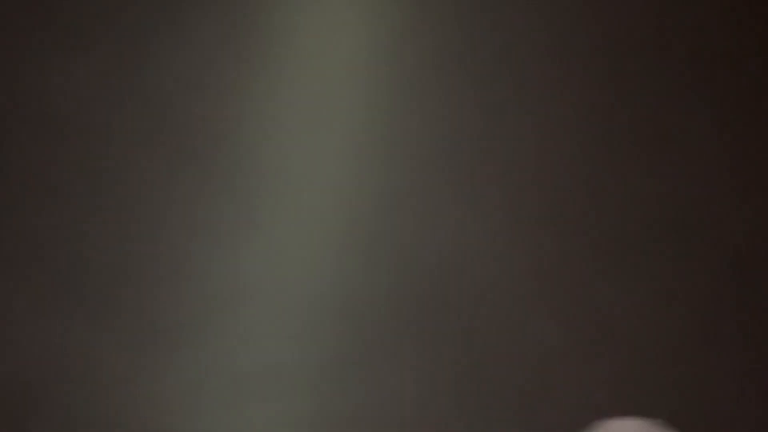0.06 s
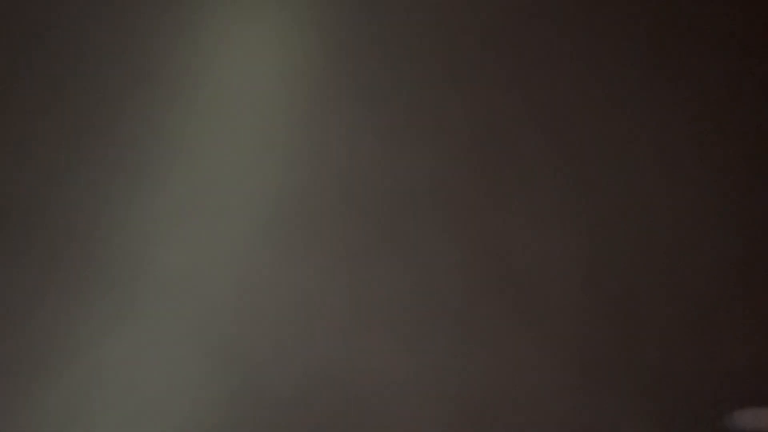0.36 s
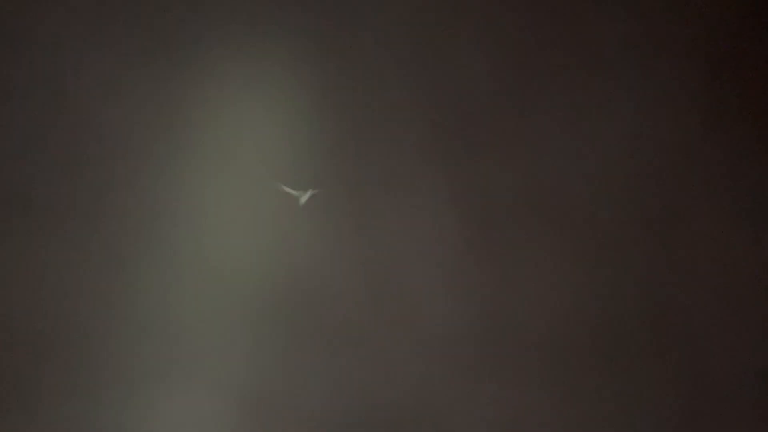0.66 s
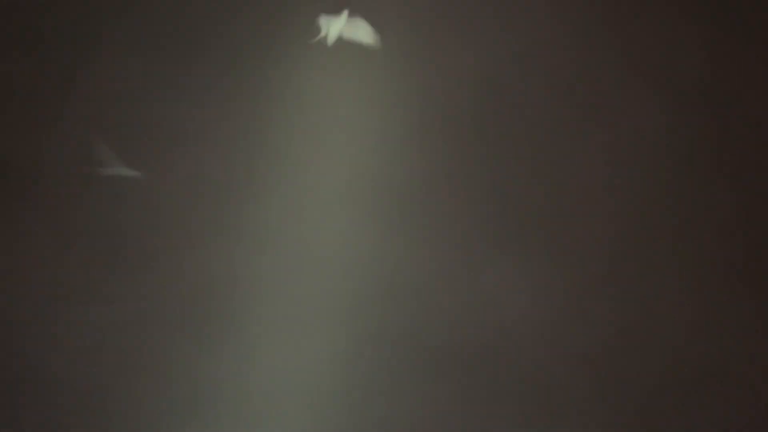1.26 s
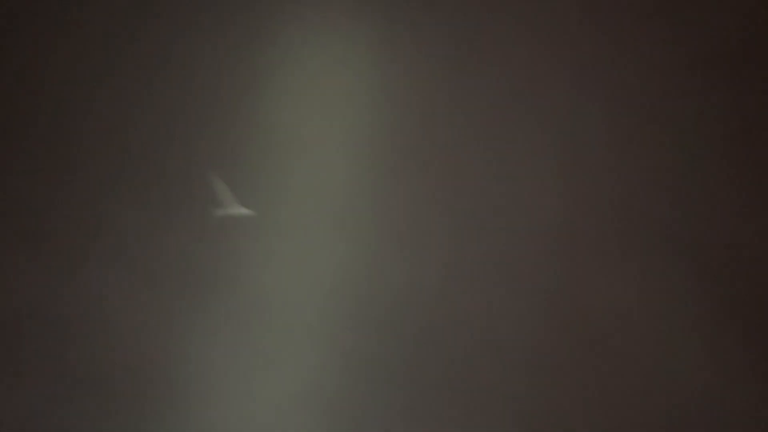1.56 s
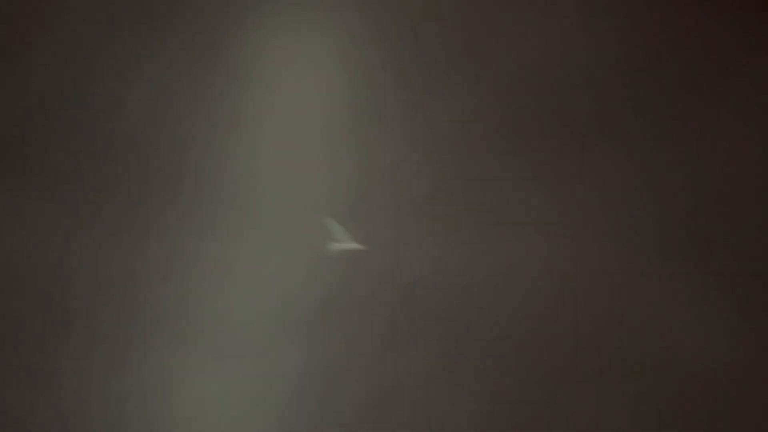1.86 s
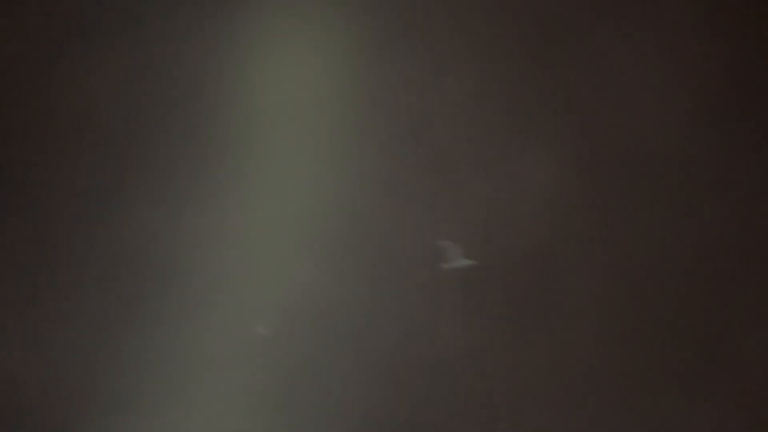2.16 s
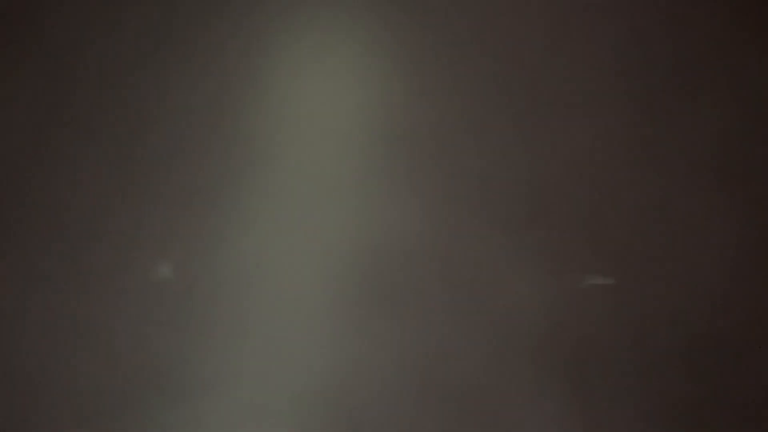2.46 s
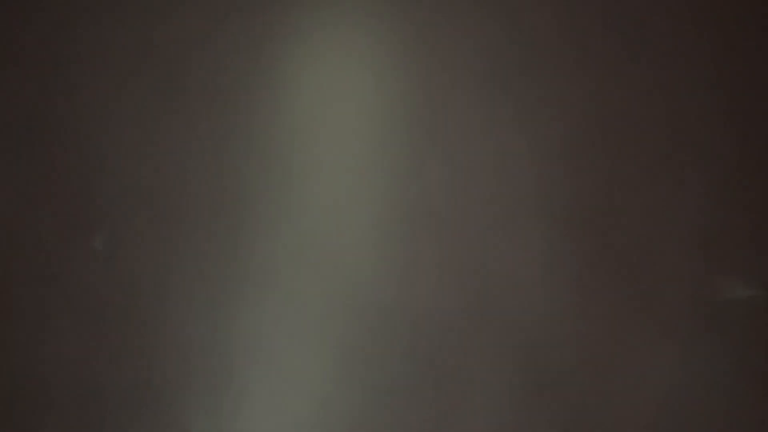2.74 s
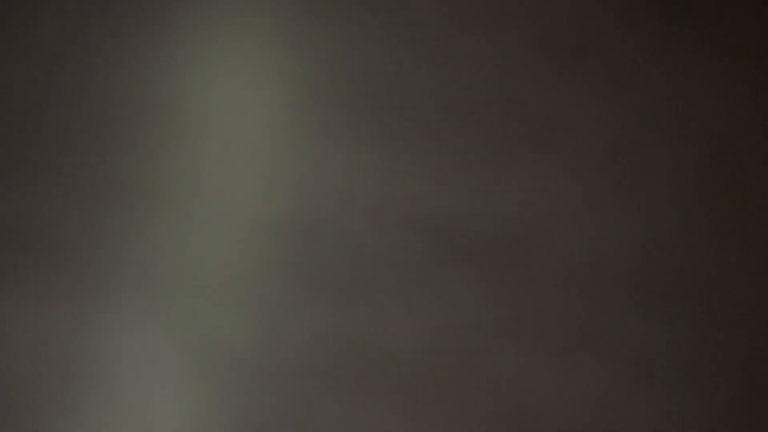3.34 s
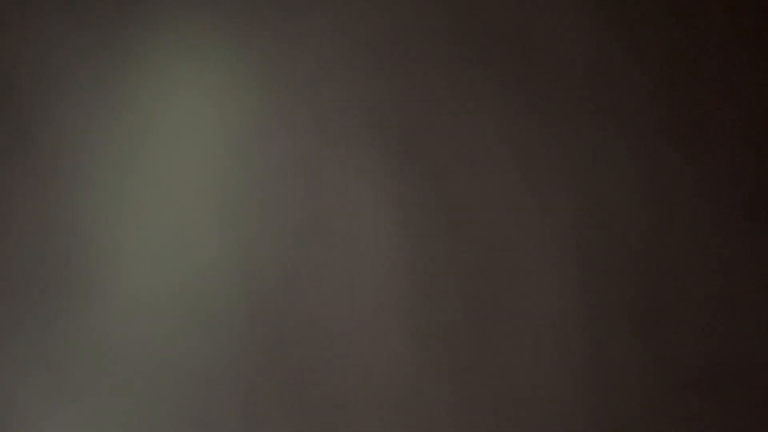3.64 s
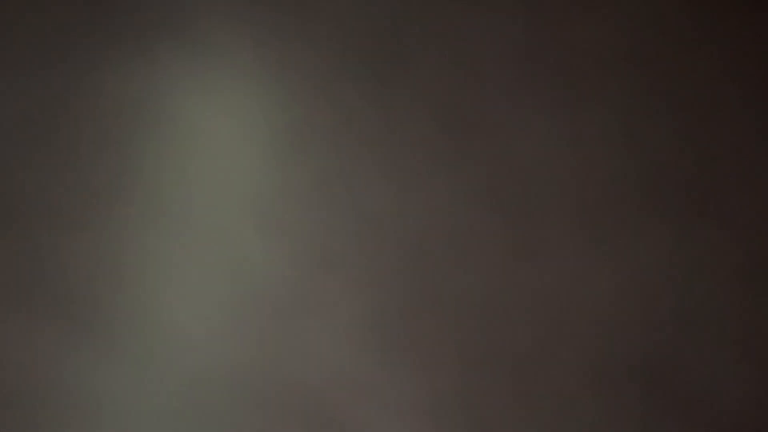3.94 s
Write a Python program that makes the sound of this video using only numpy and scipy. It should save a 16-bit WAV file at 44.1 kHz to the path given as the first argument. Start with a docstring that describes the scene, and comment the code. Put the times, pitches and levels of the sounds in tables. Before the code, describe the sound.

Harsh wailing and croaking calls of passing seabirds, with a distant colony and rumbling wind.

```python
"""A seabird colony at night, heard from a slope. From the start low wind rumbles on the microphone and
far birds cry. Passing birds give short yelps and falling cries, some close, others farther off, and the
slope answers faintly; at 0.6 s comes the first of three clean falling wails. Hoarse croaks join at 1.1 s
and drawn-out rasps at 1.5 s; yelps, croaks and rasps crowd the last second. Each passing call is a stack
of harmonics with an unsteady pitch and a rasp of noise, shaped by the throat."""
import sys
import numpy as np
from scipy import signal
from scipy.fft import rfft, irfft, next_fast_len
from scipy.io import wavfile
from scipy.ndimage import map_coordinates

SR = 44100
rng = np.random.default_rng(int(sys.argv[2]) if len(sys.argv) > 2 else 0)


def materialize(psi):
    """Save the field psi as 16-bit PCM at rate SR to the path in sys.argv[1].

    A 1-D psi becomes a single channel; in a 2-D psi each row is a channel.
    """
    bounded = np.clip(np.atleast_2d(psi).T, -1, 1)
    quanta = np.round(bounded * 32767).astype(np.int16)
    wavfile.write(sys.argv[1], SR, quanta)


N = 176400

# gusts on the microphone and the far colony's loudness (time [s], level [dB])
GUST_LEVELS = [(0, -38), (.6, -33), (1.2, -27), (1.8, -28), (2.3, -25), (2.7, -25.5), (3.2, -26),
               (3.6, -30.5), (4, -23)]
COLONY_LEVELS = [(0, -43), (.5, -44.5), (.7, -31.5), (1.1, -34.5), (1.5, -30), (2, -34), (2.6, -31),
                 (3.1, -29), (3.85, -28.5), (4, -35.5)]
# colour of the wind, the far colony and a wail's hoarse catch (frequency [Hz], relative level [dB])
GUST_SPECTRUM = [(8, 1), (17, 6), (28, 3), (68, 1), (100, -10), (200, -22.5), (600, -26), (3000, -72)]
RUSH_SPECTRUM = [(20, 1), (90, -2.5), (155, -0.5), (210, -10), (320, -17.5), (650, -14), (1500, -33),
                 (4000, -51.5)]
HISS_SPECTRUM = [(1000, -6), (3000, 5.5), (8000, -13), (15000, 0)]
COLONY_SPECTRUM = [(300, -18.5), (600, -8), (800, -2), (1050, 2), (1400, -6.5), (1900, -21), (2900, -42),
                   (3700, -30.5), (4300, -21), (4800, -28), (6000, -38), (9000, -39.5), (12000, -53)]
CATCH_SPECTRUM = [(200, -22), (800, -4.5), (1200, 12.5), (1700, -3.5), (2600, -38), (4900, -10),
                  (6300, -50), (9000, -29), (13000, -39)]
# yelps and falling cries, close or farther off (start [s], length [s], first pitch [Hz],
# middle pitch [Hz], last pitch [Hz], low band level [dB], treble level [dB], roughness [held to 0.1-1])
YELPS = [(.325, 0.076, 1062, 1125, 1012, -32, -62, 0.25), (.518, 0.072, 1016, 1133, 1150, -31.5, -68, .2),
         (.655, 0.14, 1200, 1157, 1115, -26, -50.5, 0), (1.39, 0.071, 1426, 1340, 1230, -33, -51.5, 0.35),
         (1.48, 0.055, 1275, 1367, 1250, -29.5, -61, 0.38),
         (1.595, .11, 1271, 1249, 1216, -29.5, -61, 0.51), (1.65, 0.073, 1055, 1190, 990, -21, -35, 0.3),
         (2.09, 0.07, 1040, 1235, 1137, -24, -41, 0.61), (2.275, 0.071, 1027, 1198, 1020, -27, -36, 0.23),
         (2.425, 0.081, 1527, 1440, 1284, -38.5, -62, 0.2), (3.125, 0.09, 1156, 977, 770, -32.5, -56, 0.37),
         (3.29, 0.063, 945, 1145, 940, -23.5, -34, 0.1), (3.31, .055, 1575, 1507, 1330, -29, -55, 0.42),
         (3.365, 0.067, 1444, 1560, 1365, -27.5, -51, 0.24),
         (3.415, 0.077, 1450, 1395, 1270, -27.5, -37.5, 0.54),
         (3.5, 0.098, 849, 1102, 884, -25, -33.5, 0.33), (3.615, 0.044, 1339, 1265, 1150, -30, -57, 0.36),
         (3.86, 0.093, 1106, 969, 843, -31.5, -44.5, 0.42)]
# wails, one table each (time [s], pitch [Hz], low band level [dB], treble level [dB])
WAILS = [
    [(.592, 1196, -13, -44), (.603, 1094, -15, -47), (.618, 1051, -17, -35), (.656, 1028, -18, -36.5),
     (.724, 983.4, -24, -38), (.76, 996, -21, -40), (.84, 985, -23, -39.5), (.9, 961, -24.5, -42),
     (.985, 949, -24.5, -44.5), (1.055, 860, -33, -51.5)],
    [(1.87, 938, -29, -45), (1.899, 1127, -16, -38), (1.907, 1323, -18, -36), (1.938, 1270, -15.5, -35),
     (1.946, 1027, -26, -47), (1.965, 966, -29.5, -42), (2.005, 942, -33, -45.5), (2.08, 1018, -26.5, -46),
     (2.093, 1025, -32, -52)],
    [(2.23, 1091, -20.5, -44), (2.254, 1109, -28.5, -30), (2.322, 1021, -21, -42),
     (2.384, 1026, -23.5, -43), (2.47, 1012, -27, -43.5), (2.522, 1003, -25, -39), (2.638, 950, -32, -45.5),
     (2.69, 870, -48, -53)],
]
# hoarse catches that open the first and last wail (start [s], level [dB])
CATCHES = [(.592, -26), (2.245, -29)]
# croaks and rasps, the fundamental apart from the low band (yelp columns, fundamental level [dB])
CROAKS = [(1.138, .085, 407, 555, 422, -20.5, -34, 0.52, -42),
          (1.277, 0.12, 463.6, 575.7, 481, -22, -34.5, 0.56, -38),
          (2.085, 0.12, 368.6, 500, 342, -30, -40, 0.87, -43.5),
          (2.22, 0.11, 344, 546, 503, -33.5, -39.5, 0.56, -46),
          (2.77, 0.066, 392, 414, 400, -29.5, -42, 1.1, -47),
          (3.045, .098, 450, 577, 398, -26.5, -29, 0.6, -23),
          (3.125, .078, 433, 321, 429, -34, -54, 0.65, -37.5),
          (3.195, 0.12, 411, 603.3, 460, -21.5, -29, 0.48, -26.5)]
RASPS = [(1.47, .23, 680.4, 625, 606, -34, -47, 0.89, -52.5),
         (1.72, .18, 764, 771, 730, -45.5, -51, 0.9, -40.5),
         (2.4, .31, 730, 692, 629, -34.5, -45, 1.1, -47.5), (2.71, .23, 830, 804, 743, -42, -46, 1.06, -42),
         (2.925, 0.11, 774, 762, 744, -40.5, -54.5, 0.6, -28.5),
         (3.375, 0.17, 696, 745, 704, -31.5, -37.5, 0.33, -34.5),
         (3.49, .21, 746.4, 675.7, 626, -27, -38.5, 1.01, -38),
         (3.69, 0.17, 698, 787, 734, -32.5, -42.5, 0.49, -29.5),
         (3.84, 0.17, 703, 769, 743, -36.5, -44, 0.76, -37.5)]
# throat resonances of each kind of call (frequency [Hz], relative gain [dB])
YELP_THROAT = [(500, -9), (1000, 5), (1300, 3.5), (1600, -2), (2100, -20), (2800, -31), (3300, -22.5),
               (3550, -9.5), (4500, -2.5), (5600, -12.5), (7200, -24), (9000, -21.5), (11000, -34),
               (15000, -54)]
FIRST_WAIL_THROAT = [(500, -18), (1000, 18.5), (1350, -1.5), (1900, -16), (2900, -45), (3800, -8.5),
                     (4000, -27), (4200, -9), (5000, -11), (6000, -22.5), (7100, -24), (8000, -39),
                     (9900, -28.5), (11000, -45.5), (15000, -44)]
LATER_WAIL_THROAT = [(500, -16), (1000, 5), (1350, 0), (1900, -31.5), (2900, -48), (3850, -6.5),
                     (4100, -18), (4700, -12.5), (5500, -12), (6150, -14), (6700, -23), (7150, -17.5),
                     (7900, -38), (9100, -27.5), (10200, -33.5), (11000, -43), (15000, -46)]
CROAK_THROAT = [(250, -0.5), (500, 7), (750, -10), (950, .5), (1200, -0.5), (1650, -5), (1900, -19),
                (2200, -17), (2600, -26), (3300, -22), (3800, -12.5), (4350, -3), (5000, -17.5),
                (5400, -12.5), (5800, -28), (6500, -22), (7200, -32.5), (9100, -20), (10300, -46),
                (12800, -34), (15000, -51)]
RASP_THROAT = [(400, -53), (750, -8), (1300, 12), (1600, 11.5), (2100, -14.5), (2800, -29), (3400, -21),
               (4130, -21), (4290, -3.5), (4470, -11.5), (5500, -22), (6300, -25), (7000, -29), (7700, -33),
               (8500, -24), (9300, -36.5), (15000, -46)]

TOP_HZ = 15750
# unsteadiness of a voice [changes a second]
WAVER_RATE, QUAVER_RATE, JITTER_RATE = 30, 110, 420  # in pitch
SHIMMER_RATE, FLUTTER_RATE, GRATE_RATE = 38, 116.6, 330  # in level


def amp(db):
    """Decibels to gain."""
    return 10 ** (np.asarray(db) / 20)


def unit(x):
    """Scale to rms 1."""
    return x / np.sqrt(np.mean(x ** 2) + 1e-20)


def gain_at(spectrum, hz):
    """Gain of a (frequency [Hz], level [dB]) table, read along a log frequency axis."""
    knots_hz, db = np.transpose(spectrum)
    return amp(np.interp(np.log(hz + 1), np.log(knots_hz + 1), db))


def curves(rows, t):
    """Each column after the time, at the times t."""
    times, *columns = np.transpose(rows)
    return [np.interp(t, times, column) for column in columns]


def wobble(rate, size):
    """A smooth random curve, rate knots a second."""
    knots = rng.standard_normal(size // 16 + 8)
    return map_coordinates(knots, [np.arange(size) * rate / SR], mode="mirror")


def tremble(rate, n):
    """The first n samples of a half-second wobble, enough for one call."""
    return wobble(rate, SR // 2)[:n]


def filtered(x, response):
    """Filter x by a gain that depends on frequency."""
    size = next_fast_len(len(x) + 4096)
    return irfft(rfft(x, size) * response(np.fft.rfftfreq(size, 1 / SR)), size)[:len(x)]


def noise(spectrum):
    """Coloured noise of rms 1."""
    return unit(filtered(rng.standard_normal(N), lambda hz: gain_at(spectrum, hz)))


def add(out, start, x):
    """Mix x in from a start time."""
    part = out[max(0, round(start * SR)):][:len(x)]
    part += x[:len(part)]


def fade(t, attack_s, release_s):
    """Smooth attack, hold and release."""
    rise = np.sin(np.pi / 2 * np.clip(t / attack_s, 0, 1))
    return rise * np.sin(np.pi / 2 * np.clip((t[-1] - t) / release_s, 0, 1))


def wind(rush_db=-32.5, hiss_db=-62.5):
    """Gusts rumble right on the microphone, over a steady low rush and a faint hiss."""
    level_db, = curves(GUST_LEVELS, np.arange(N) / SR)
    gusts = amp(level_db + 0.52 * wobble(8.5, N)) * noise(GUST_SPECTRUM)
    return gusts + amp(rush_db) * noise(RUSH_SPECTRUM) + amp(hiss_db) * noise(HISS_SPECTRUM)


def colony(count=64, length_s=.2, low_hz=620, high_hz=1200, murmur_db=-2):
    """Far off, birds cry over one another; the farthest merge into a murmur near 1 kHz."""
    cries = np.zeros(N)
    progress = np.linspace(0, 1, int(length_s * SR))
    arch = np.sin(np.pi * progress)
    for i, (delay, height) in enumerate(rng.random((count, 2))):
        contour = 1 + .1 * arch - .1 * progress + .014 * wobble(QUAVER_RATE, len(arch))
        pitch = low_hz * (high_hz / low_hz) ** height * contour
        phase = 2 * np.pi * np.cumsum(pitch) / SR
        cry = sum(np.cos(k * phase + k * k) for k in range(1, 13))
        add(cries, (i + delay) * N / SR / count - length_s / 2, cry * arch)
    voices = unit(filtered(cries, lambda hz: gain_at(COLONY_SPECTRUM, hz)))
    level_db, = curves(COLONY_LEVELS, np.arange(N) / SR)
    return amp(level_db) * unit(voices + amp(murmur_db) * noise(COLONY_SPECTRUM))


def voice(pitch, throat, jitter, noise_db, split_hz, cracking, waver=.004, shimmer_db=4, grate_db=1.9):
    """Harmonics and breath through a throat: fundamental, overtones, air below split_hz; treble above."""
    n = len(pitch)
    pitch = pitch * (1 + waver * tremble(WAVER_RATE, n))
    phase = 2 * np.pi * np.cumsum(pitch * (1 + jitter * tremble(JITTER_RATE, n))) / SR
    k = np.arange(1, int(TOP_HZ / pitch.mean()) + 1)[:, None]  # harmonic numbers
    high = k[:, 0] * pitch.mean() > split_hz
    offsets = rng.uniform(0, 2 * np.pi, (64, 1))[:len(k)]
    knots = rng.standard_normal((64, 32))[:len(k)]
    shimmer = np.array([np.interp(np.arange(n) * SHIMMER_RATE / SR, np.arange(32), row) for row in knots])
    gains = gain_at(throat, k * pitch) * amp(shimmer_db * shimmer * high[:, None])
    partials = gains * np.cos(k * phase + offsets) * (k * pitch < SR / 2)
    puffs = rng.standard_normal(SR)[:n] * (1 + np.cos(phase))  # one puff of breath a cycle
    low_air = unit(filtered(puffs, lambda hz: gain_at(throat, hz) * (hz < split_hz)))
    high_air = unit(filtered(puffs, lambda hz: gain_at(throat, hz) * (hz >= split_hz)))
    grating = amp(grate_db * tremble(GRATE_RATE, n))  # the treble comes in uneven spurts
    crack = 1 + cracking * np.cos(phase / 2)  # alternate cycles differ in strength
    high_tone = unit(crack * grating * partials[high].sum(0))
    treble = unit(high_tone + amp(noise_db + 7) * high_air)  # 7 dB breathier than the low band
    return partials[0], partials[~high][1:].sum(0), amp(noise_db) * low_air, treble


def arched_calls(table, throat, attack_s, release_s, split_hz,
                 jitter, quaver, noise_db, flutter_db, cracking):
    """Calls quavering along an arch of pitch; roughness scales the settings from jitter onward."""
    out = np.zeros(N)
    for start, length, first_hz, middle_hz, last_hz, low_db, treble_db, rough, *fundamental_db in table:
        t = np.arange(int(length * SR)) / SR
        rough = np.clip(rough, .1, 1)
        place = 2 * t / length - 1
        bend = np.abs(place) ** 1.6  # a power of 1 gives a pointed arch, 2 a round one
        pitch = middle_hz + (np.where(place < 0, first_hz, last_hz) - middle_hz) * bend
        pitch *= 1 + quaver * rough * tremble(QUAVER_RATE, len(t))
        fundamental, overtones, air, treble = voice(
            pitch, throat, jitter * rough, noise_db + 20 * np.log10(rough), split_hz, cracking * rough)
        if fundamental_db:
            low = amp(fundamental_db[0]) * unit(fundamental) + amp(low_db) * unit(unit(overtones) + air)
        else:
            low = amp(low_db) * unit(unit(fundamental + overtones) + air)
        flutter = amp(flutter_db * rough * tremble(FLUTTER_RATE, len(t)))
        effort = fade(t, attack_s, release_s)
        swell = np.abs(effort) ** 1.4  # the treble swells later and dies sooner than the low band
        add(out, start, effort * (flutter * low + amp(treble_db) * np.sqrt(flutter) * swell * treble))
    return out


def yelps():
    """Short yelps and falling cries, some close and loud, others fainter and farther off."""
    return arched_calls(YELPS, YELP_THROAT, attack_s=.02, release_s=.02, split_hz=2000,
                        jitter=.02, quaver=.04, noise_db=-9, flutter_db=3, cracking=1)


def slope_echo(birds, level_db=-8, t60_s=.13, delay_s=.0082):
    """The slope scatters the passing calls back to the microphone as a short diffuse tail."""
    t = np.arange(SR // 2) / SR
    tail = rng.standard_normal(len(t)) * amp(-60 * t / t60_s) * (t > delay_s)
    return amp(level_db) * signal.fftconvolve(birds, tail / np.linalg.norm(tail))[:N]


def wails(full_break_hz_per_s=7000):
    """Long, nearly pure cries that sag; the voice breaks while the pitch moves fast."""
    out = np.zeros(N)
    for rows, throat in zip(WAILS, [FIRST_WAIL_THROAT, LATER_WAIL_THROAT, LATER_WAIL_THROAT]):
        start = rows[0][0]
        t = np.arange(int((rows[-1][0] - start) * SR)) / SR
        pitch, low_db, treble_db = curves(rows, start + t)
        breaking = np.minimum(np.abs(np.gradient(pitch)) * SR / full_break_hz_per_s, 1)
        fundamental, overtones, air, treble = voice(
            pitch, throat, jitter=.0026 + .007 * breaking,
            noise_db=-20, split_hz=2700, cracking=.6 * breaking)
        cry = amp(low_db) * (unit(fundamental + overtones) + air) + amp(treble_db) * treble
        add(out, start, cry * fade(t, attack_s=.005, release_s=.005))
    return out


def catches(attack_s=.0036, decay_s=.093):
    """Bursts of hoarse noise that die as a wail settles on its pitch."""
    out = np.zeros(N)
    for start, db in CATCHES:
        t = np.maximum(np.arange(N) / SR - start, 0)
        envelope = np.minimum(t / attack_s, 1) * np.exp(-t / decay_s)
        out += amp(db) * envelope * noise(CATCH_SPECTRUM)
    return out


def croaks():
    """Hoarse calls at about half a yelp's pitch, as when a yelping voice breaks to half its pitch; their dense
    harmonics are shaped by the throat."""
    return arched_calls(CROAKS, CROAK_THROAT, attack_s=.035, release_s=.03, split_hz=1420,
                        jitter=.017, quaver=.025, noise_db=-13, flutter_db=3, cracking=.6)


def rasps():
    """Drawn-out breathy calls through a throat that rings near 1.5 kHz."""
    return arched_calls(RASPS, RASP_THROAT, attack_s=.025, release_s=.035, split_hz=2600,
                        jitter=.014, quaver=.03, noise_db=-9, flutter_db=2.8, cracking=.4)


def scene():
    """One microphone hears the passing birds, their echo, the far colony and the wind."""
    birds = wails() + catches() + yelps() + croaks() + rasps()
    return (birds + slope_echo(birds) + colony() + wind())[None]


def record(dry):
    """The camera keeps nothing above its band limit."""
    return np.array([filtered(x, lambda hz: hz < TOP_HZ) for x in dry])


dry = scene()
out = record(dry)
materialize(out)
```